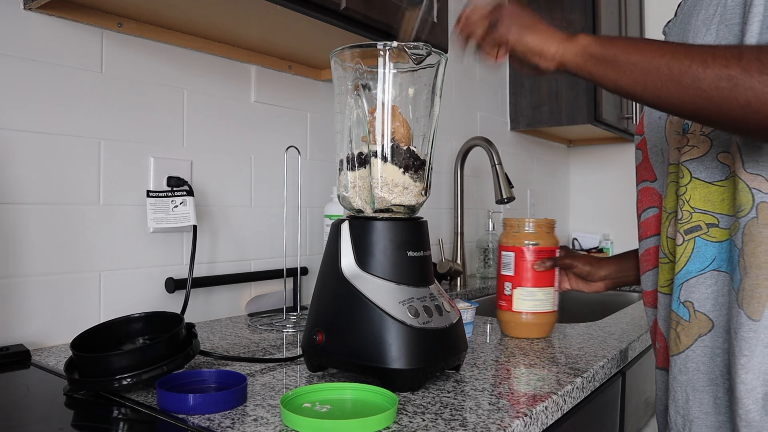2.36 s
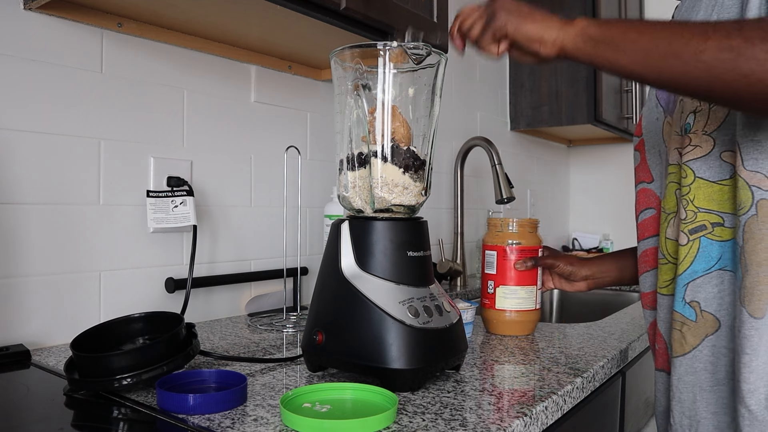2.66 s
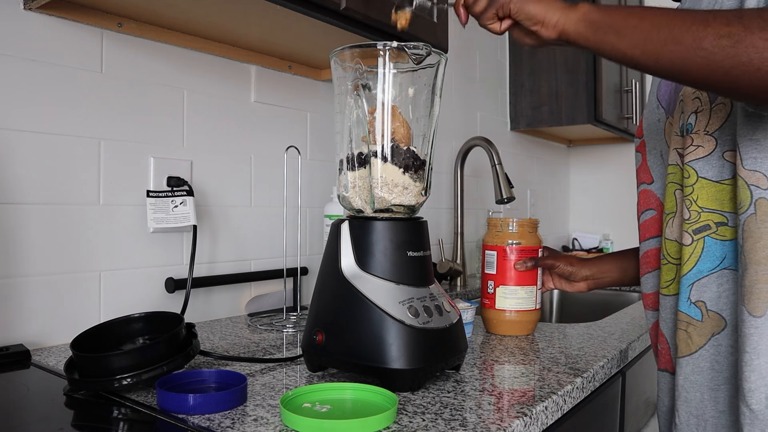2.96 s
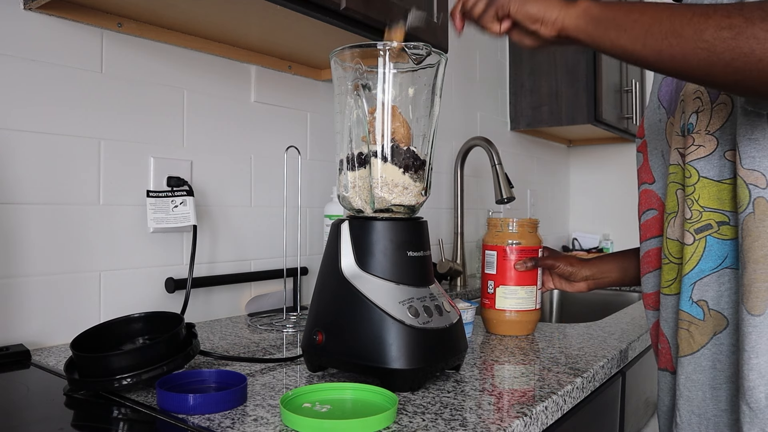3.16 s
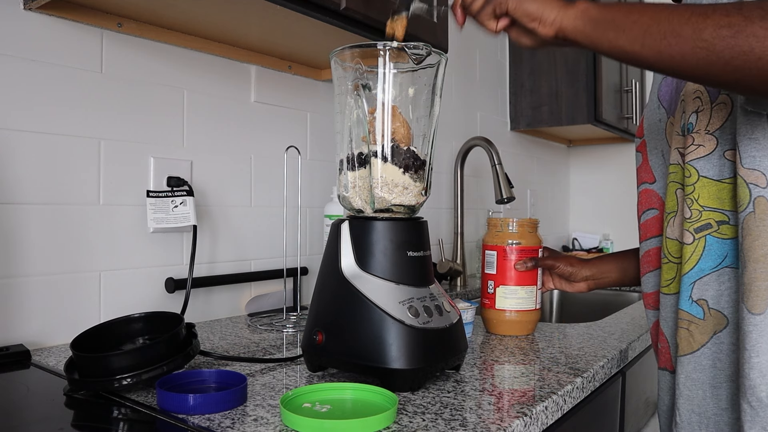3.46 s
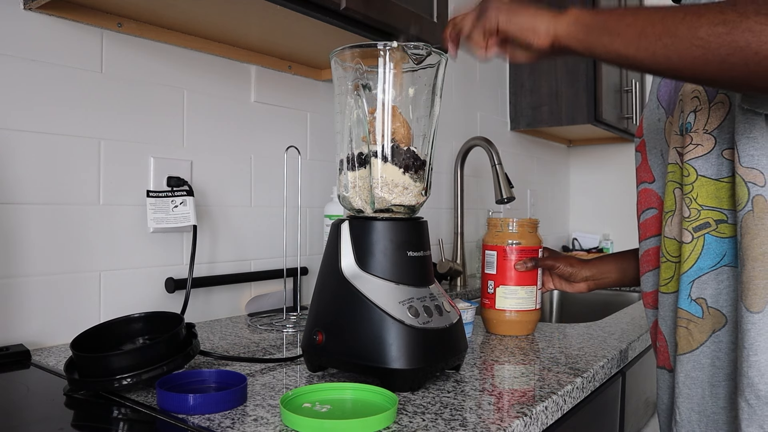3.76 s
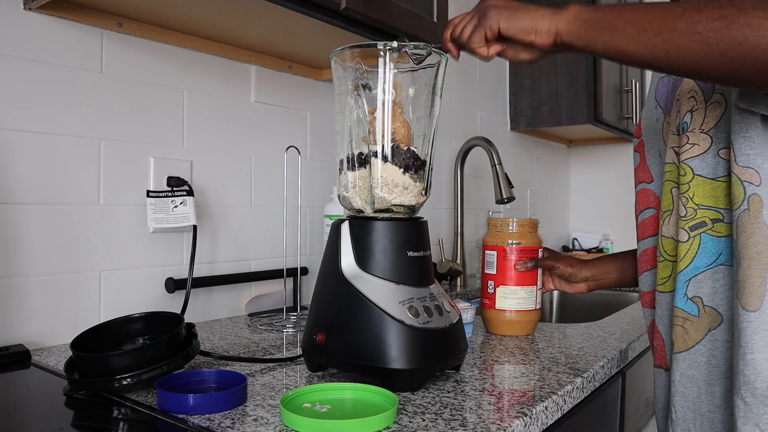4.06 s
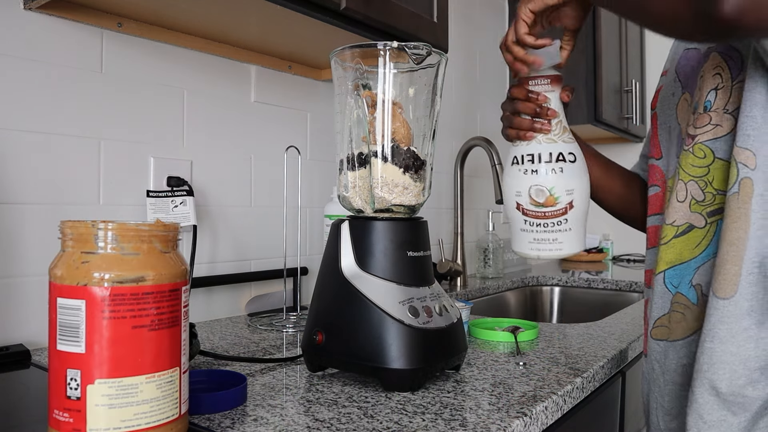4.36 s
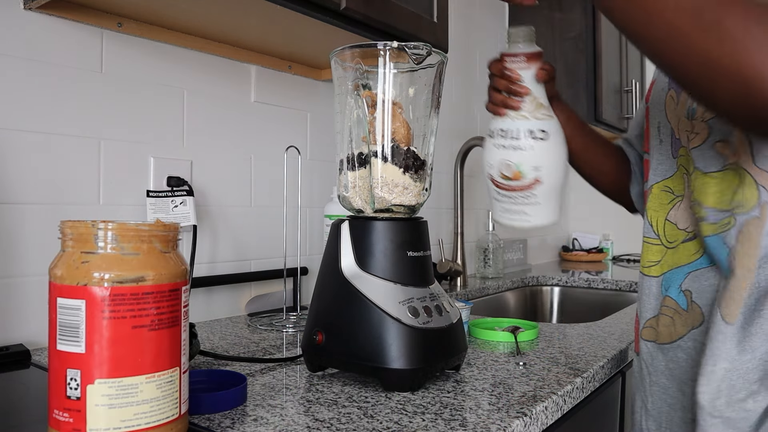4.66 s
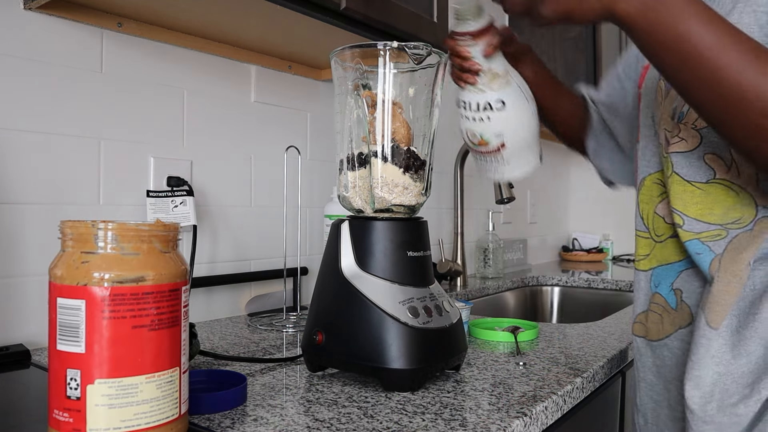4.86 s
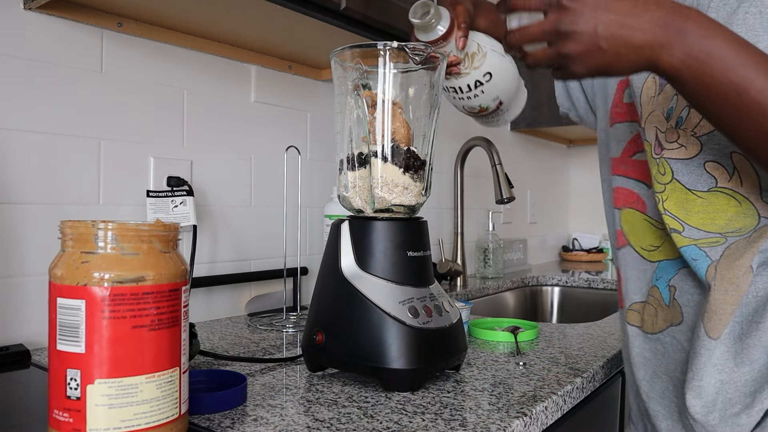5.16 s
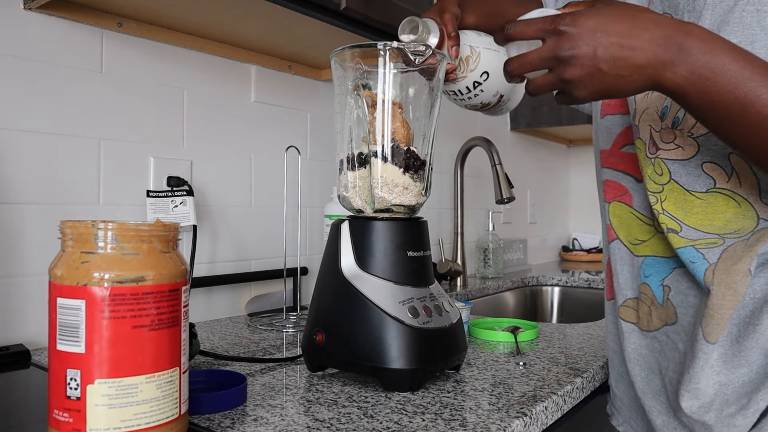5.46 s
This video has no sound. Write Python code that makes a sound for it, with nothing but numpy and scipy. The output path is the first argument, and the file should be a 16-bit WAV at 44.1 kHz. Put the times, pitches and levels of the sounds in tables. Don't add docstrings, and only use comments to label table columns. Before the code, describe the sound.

Low steady hum and faint hiss open the scene, with small hand contacts and a soft thud. Nine bright, ringing metal-on-glass clinks follow at an even pace, each with a low bump from the blender base and short hard-walled reverberation. The last is cut off by a scene change to sharp plastic cap snaps, a brief thread rub and hollow bottle sound, then mostly hum. Near microphone, sources slightly left.

```python
import sys
import numpy as np
from scipy import signal
from scipy.fft import rfft, irfft, next_fast_len
from scipy.io import wavfile
from scipy.ndimage import map_coordinates

SR = 44100
rng = np.random.default_rng(int(sys.argv[2]) if len(sys.argv) > 2 else 0)


def boost_factor(decibels):
    exponent = np.asarray(decibels, float) / 20
    return 10 ** exponent


def put_to_file(sound):
    columns = np.atleast_2d(sound).T
    safe = np.clip(columns, -1, 1)
    whole_steps = np.round(safe * 32767)
    wavfile.write(sys.argv[1], SR, whole_steps.astype(np.int16))


N = 246959

# first fades from, first gone and second begins, second full [start_s]
SCENE_CHANGE_S = (4.135, 4.162, 4.174)

# pitch_hz, level_db (rms)
MOTOR_LINES = [
    (59.2, -36),
    (296.1, -72),
    (355.3, -59.5),
]
# frequency_hz, density_db (per Hz)
RUMBLE_SPECTRUM = [(15, -23.5), (30, 13.5), (50, -10), (75, 13), (100, -5), (140, -100.5)]
# frequency_hz, density_db (per Hz)
AIR_SPECTRUM = [(80, -36), (100, -20.5), (258, -20.5), (303, -12), (336, -23), (364, -15), (556, -22),
                (1020, -29), (2980, -35.5), (5240, -41), (6950, -40), (9500, -48), (12000, -44),
                (15500, -85)]
# frequency_hz, correlation (-1..1)
PORT_CORRELATION = [(60, 1), (140, .96), (330, .8), (760, .05), (1760, -.42), (4100, -.52), (9550, -.58)]
# frequency_hz, t60_s
ROOM_DECAY = [(200, 0.74), (1500, 0.66), (4000, 0.76), (9000, 0.42), (11000, 0.19), (14000, 0.047)]

# start_s, level_db (peak), knock_db, t60_s, tilt_db (per octave)
CONTACTS = [(0.27, -41, -1, 0.04, 22), (0.5478, -46, -4, 0.017, 12), (1.0255, -40, -4, 0.082, 10),
            (1.4372, -38, -40, 0.036, 3), (1.5669, -20, -2.5, 0.072, 3), (4.1933, -12.5, -9.5, 0.042, 2),
            (4.2098, -11, -12.5, 0.023, 5), (4.2179, -23, 4, 0.02, 2), (4.2318, -42, -5.5, 0.02, -7),
            (4.3095, -24.5, 5, 0.0091, -5), (4.3189, -41, 16, 0.023, -6), (4.339, -29.5, -9, 0.022, -5),
            (4.3676, -33.5, 13, 0.024, 18), (4.4008, -29, -20, 0.067, 5.5), (4.4237, -22, -7, 0.016, -6),
            (4.4615, -26, 0.5, 0.055, 2.5), (4.6792, -37, 11, 0.037, 9.5), (5.3298, -37.5, -22, 0.11, -1)]
# frequency_hz, density_db (per Hz)
PLASTIC_SPECTRUM = [(300, -14.5), (750, 0), (1300, -11), (2400, -5), (4500, -16.5), (7300, -18.5),
                    (10000, -42), (12000, -73), (22000, -120)]
# pitch_hz, width_hz, level_db
BOTTLE_MODES = [
    (200, 11.3, 1),
    (296, 38, -0.5),
    (720, 600, -18),
    (860, 90, -13),
]
# start_s, level_db, pitch_hz, t60_s
BODY_TONES = [
    (1.568, -5.5, 157, 0.0082),
    (1.584, -18, 73, 0.13),
    (1.779, -10.5, 112, 0.021),
    (1.811, -31, 193, 0.08),
    (4.194, -22.5, 720, 0.025),
    (4.21, -26.5, 860, 0.047),
    (4.462, -46.5, 1497, 0.2),
]

# start_s, force_db, around (rim, -0.9..1.1), lengthwise (spoon, -1.5..1.6)
KNOCKS = [
    (2.2193, -8, 0.065, 1.57),
    (2.434, -5.5, -0.89, 0.01),
    (2.6335, -5, -0.31, 0.17),
    (2.8525, -2.5, -0.51, -0.18),
    (3.0831, -1.5, 0.43, 0.26),
    (3.3244, -2.5, 1.09, -0.25),
    (3.561, -2.6, 1, .2),
    (3.8211, -1.16, 0.3, -1.44),
    (4.0868, 1.5, -0.13, -0.65),
]
MODE_HZ = (931, 1029, 1717, 2254, 2464, 3009, 3537, 4096, 4140, 4270, 4357, 4410, 4899, 5055, 5701, 6270,
           6988, 7428, 7650, 7763, 7934, 8411, 8549, 8690, 9432, 11060, 14100, 14800)
# level_db, t60_s
MODE_DECAY = [(-14.5, 0.65), (-16.5, 1), (-32.5, 0.66), (0, 0.39), (-6, 0.93), (7.5, 0.41), (-6.5, 0.383),
              (-14.5, .3), (-9.5, 0.83), (-17, 0.3), (0.5, 0.75), (-14.5, .2), (-29.5, .2), (-3.5, 0.16),
              (-22.5, 0.24), (-5.5, .2), (-24, 0.15), (-34.5, 0.13), (-14, 0.18), (-23, 0.16), (-6.5, .22),
              (-10, 0.13), (-26, .18), (-3.5, .18), (-36, .2), (-15.5, .12), (-30, .6), (-30, .6)]
FAMILY_HZ = (1000, 2260, 2460, 3010, 4140, 4360, 5050, 6300, 8400)
AROUND_DB = (-0.5, 1.7, -1.5, 7.5, -10, 0.9, 6.5, -0.8, 4.5)
LENGTHWISE_DB = (1.6, -3, 6.5, 0, -5.5, 1.4, -1.5, 4.5, 4)
# frequency_hz, density_db (per Hz)
CRACK_SPECTRUM = [(150, -53.5), (700, -27), (1500, -22.5), (2300, -15), (3300, -12), (3900, -15), (4250, 3),
                  (4750, -16), (5350, -14.5), (6300, -11), (8500, -5), (10000, -14.5), (12000, -45),
                  (17000, -100)]
# frequency_hz, density_db (per Hz)
BASE_SPECTRUM = [(20, -59), (45, 2.5), (110, -10), (200, -4.5), (300, 0.5), (400, -4.5), (500, -10.5),
                 (620, -37.5), (900, -40.5)]

# start_s, level_db
GRIP = [
    (4.19, -31.5),
    (4.225, -38.5),
    (4.265, -59),
    (4.34, -40),
    (4.41, -41.5),
    (4.46, -70),
    (4.56, -70),
]

LEFTWARD_DB = [[1.8], [-1.8]]
BASE_DB = -20
BUMP_HZ, BUMP_AT_S, BUMP_S, BUMP_DB = 342, 0.012, 0.0071, 4.5
LEFT_LAG_S, MOST_LAG_RAD = 0.0001, 1.41
RUB_START_S, RUB_END_S, RUB_DB, RUB_SAG_DB_PER_S, RUB_RELEASE_S = 4.192, 4.425, -35, 51, 0.019
WAKE_DB, WAKE_S = -5.5, 0.82
SINK_DB, SINK_LAG_S, SINK_S, LOWEST_DB = 4, 0.28, 0.28, -12.5
MIC_TOP_HZ = 12740


def unit(x):
    return x / np.sqrt(np.mean(x ** 2) + 1e-20)


def along(points, hz):
    f, v = np.transpose(points)
    return np.interp(np.log(hz + 1), np.log(f + 1), v)


def decay(t, t60):
    return boost_factor(-60 * t / t60)


def wobble(rate):
    knots = rng.standard_normal(int(N * rate / SR) + 4)
    return map_coordinates(knots, [np.arange(N) * rate / SR])


def filtered(x, response):
    n = x.shape[-1]
    m = next_fast_len(n + 4096)
    return irfft(rfft(x, m) * response(np.fft.rfftfreq(m, 1 / SR)), m)[..., :n]


def rush(spectrum, size=N):
    def mid_side(hz):
        angle = np.arccos(np.clip(along(PORT_CORRELATION, hz), -1, 1)) / 2
        return boost_factor(along(spectrum, hz)) * [np.cos(angle), np.sin(angle)]

    mid, side = filtered(rng.standard_normal((2, size)), mid_side)
    return unit(np.array([mid + side, mid - side]))


def echoed(x, wet_db):
    burst = rush([(20, 0.016), (20000, 0.048)], size=SR // 3)
    hz, t, z = signal.stft(burst, SR, nperseg=256)
    tail = signal.istft(z * decay(t, along(ROOM_DECAY, hz)[:, None]), SR, nperseg=256)[1]
    tail = tail * np.minimum(np.arange(tail.shape[1]) / (0.01 * SR), 1)
    mono = x.sum(0, keepdims=True) / 2
    wet = signal.fftconvolve(mono, tail / np.linalg.norm(tail[0]), axes=1)
    return np.pad(x, ((0, 0), (0, tail.shape[1] - 1))) + boost_factor(wet_db) * wet


def add(track, s, x):
    part = track[:, round(s * SR):][:, :x.shape[1]]
    part += x[:, :part.shape[1]]


def kitchen():
    turn = 2 * np.pi * np.arange(N) / SR
    drift = 0.15 * wobble(5.4)
    lines = 0
    for hz, db in MOTOR_LINES:
        level = boost_factor(db + 2.0 + 0.48 * wobble(1.9))
        lines = lines + level * np.sin(hz * turn + hz / 59 * drift + 1.05)
    rumble = unit(filtered(rng.standard_normal(N), lambda hz: boost_factor(along(RUMBLE_SPECTRUM, hz))))
    air = rush([(40, -74.0)] + AIR_SPECTRUM + [(17000, -120)])
    air_level = boost_factor(-45 + 0.62 * wobble(2) + 0.4 * wobble(9))
    return lines + boost_factor(-55) * rumble + air_level * air


def bottle_response(hz):
    total = 0
    for k, (centre, width, db) in enumerate(BOTTLE_MODES):
        damping = 1j * hz * width
        total = total + (-1) ** k * boost_factor(db) * damping / (centre * centre - hz * hz + damping)
    return total


def handling():
    out, t = np.zeros((2, N)), np.arange(SR // 6) / SR
    for s, db, low_db, t60, tilt_db in CONTACTS:
        tilt = lambda f: boost_factor(tilt_db * np.log2(np.minimum(f, 7500) / 2000 + 0.11))
        bright = unit(filtered(rush(PLASTIC_SPECTRUM, size=len(t)), tilt))
        fade = decay(t, max(t60, 0.004)) + 0.5 * decay(t, 0.0072)
        snap = boost_factor(LEFTWARD_DB) * (1 - np.exp(-t / 0.00023)) * bright * fade
        knock = filtered(rng.standard_normal(len(t)) * decay(t, 0.036), bottle_response)
        tick = snap + boost_factor(low_db - 2) * knock / abs(knock).max()
        add(out, s, boost_factor(db - 7.5) * echoed(tick, wet_db=-4.5))
    for s, db, hz, t60 in BODY_TONES:
        push = np.sin(2 * np.pi * hz * t) * decay(t, t60) * (1 - np.exp(-t * hz / 0.69))
        add(out, s, boost_factor(db + 3.5) * np.array([push, push]))
    return out


def glass_ring(t, hz, family_db, lead):
    level, t60 = np.transpose(MODE_DECAY)[:, :, None]
    struck = boost_factor(level + np.interp(hz, FAMILY_HZ, family_db) + rng.normal(0, 0.93, hz.shape))
    first_swing = 6.0 * (hz > 3300) * decay(t, 0.025)
    fade = decay(t, np.minimum(0.59 * t60, 1.1)) + first_swing
    detuned = hz * (1 + rng.normal(0, 0.0006, hz.shape))
    turn = 2 * np.pi * (detuned * t + rng.random(hz.shape))
    return np.array([(struck * fade * np.sin(turn + side * lead)).sum(0) for side in (0.5, -0.5)])


def contact_crack(t, family_db):
    tint = lambda f: boost_factor(0.73 * np.interp(f, FAMILY_HZ, family_db))
    noise = filtered(rush(CRACK_SPECTRUM, size=len(t)), tint)
    clatter = filtered(noise, lambda f: 1 / (1 + (f / 9600) ** 24))
    return clatter * decay(t, 0.079) + 1.61 * noise * decay(t, 0.036)


def base_thud(t, shudder):
    pulse = np.exp(-((t - BUMP_AT_S) / BUMP_S) ** 2)
    bump = boost_factor(BUMP_DB + rng.normal(0, 1.5)) * np.sin(2 * np.pi * BUMP_HZ * t) * pulse
    note = 0.47 * np.sin(2 * np.pi * 293 * t) * decay(t, 0.65)
    return (shudder * decay(t, 0.43) + bump + note) * (1 - np.exp(-t / 0.0038))


def spoon():
    out, t = np.zeros((2, N)), np.arange(SR * 2 // 5) / SR
    hz = np.array(MODE_HZ)[:, None]
    shudder = rush(BASE_SPECTRUM, size=len(t))
    lead = rng.normal(0, 0.13, hz.shape) - np.minimum(2 * np.pi * hz * LEFT_LAG_S, MOST_LAG_RAD)
    rise = 1 - np.exp(-t / 0.0004)
    for s, db, around, lengthwise in KNOCKS:
        family_db = around * np.array(AROUND_DB) + lengthwise * np.array(LENGTHWISE_DB)
        ring = echoed(glass_ring(t, hz, family_db, lead) * rise, wet_db=-12)
        crack = echoed(contact_crack(t, family_db) * rise, wet_db=-1.0)
        hit = (boost_factor(-14.5) * ring + boost_factor(-0.5) * crack) * boost_factor(LEFTWARD_DB)
        add(out, s - 0.0007, boost_factor(db) * hit)
        add(out, s - 0.0004, boost_factor(BASE_DB) * base_thud(t, shudder))
    fade_s = (SCENE_CHANGE_S[0], SCENE_CHANGE_S[1] + 0.006)
    return out * np.interp(np.arange(N) / SR, fade_s, (1, 0))


def cap():
    t = np.arange(N) / SR
    release = np.clip(1 - (t - RUB_END_S) / RUB_RELEASE_S, 0, 1)
    rub = boost_factor(RUB_DB - RUB_SAG_DB_PER_S * (t - RUB_START_S)) * (t > RUB_START_S) * release
    grain = boost_factor(3.5 * wobble(220))
    thread = rub * boost_factor(LEFTWARD_DB) * unit(grain * rush(PLASTIC_SPECTRUM))
    body = unit(filtered(rng.standard_normal(N) * boost_factor(1.6 * wobble(50)), bottle_response))
    held = np.interp(t, (4.185, 4.195, 4.5, 4.56), (0, 1, 1, 0))
    return thread + held * boost_factor(np.interp(t, *np.transpose(GRIP))) * body


def slow_gain_db():
    t = np.arange(N) / SR
    steps = np.clip((t - np.array(KNOCKS)[:, :1] - SINK_LAG_S) / SINK_S, 0, 1).sum(0)
    return np.interp(t, (0, WAKE_S), (WAKE_DB, 0)) + np.maximum(-SINK_DB * steps, LOWEST_DB)


def scene():
    return kitchen() + handling() + spoon() + cap()


def roll_off(x):
    return signal.sosfilt(signal.butter(12, 15600, fs=SR, output="sos"), x)


def record(dry):
    t, slow_db = np.arange(N) / SR, slow_gain_db()
    when = np.array(KNOCKS)[:, :1]
    since = np.maximum(t - when, 0)
    depth_db = np.minimum(-12 - 1.17 * np.interp(when, t, slow_db), 0)
    duck_db = (depth_db * (1 - np.exp(-since / 0.0097)) * np.exp(-(since / 0.062) ** 2)).sum(0)
    before_change = np.interp(t, SCENE_CHANGE_S[1:], (1, 0))
    x = dry * boost_factor((slow_db + duck_db) * before_change)
    clipped = x / (1 + abs(x / 0.93) ** 6) ** (1 / 6)
    mix = filtered(clipped, lambda hz: 1 / (1 + (hz / MIC_TOP_HZ) ** 8) ** 0.5)
    return roll_off(mix)


dry = scene()
out = record(dry)
put_to_file(out)
```